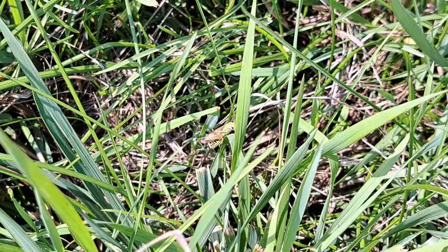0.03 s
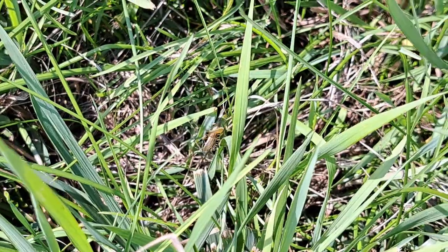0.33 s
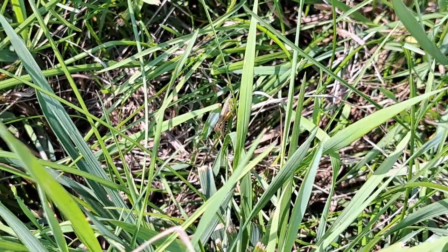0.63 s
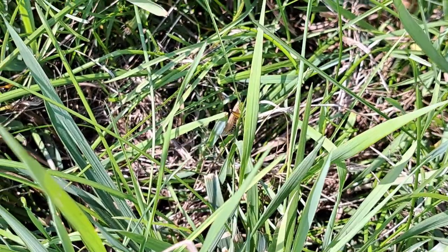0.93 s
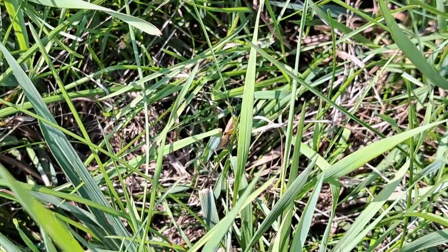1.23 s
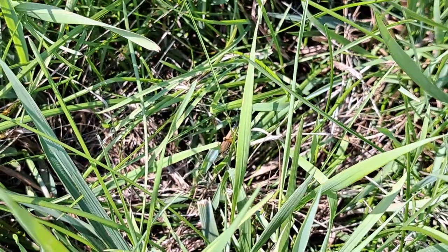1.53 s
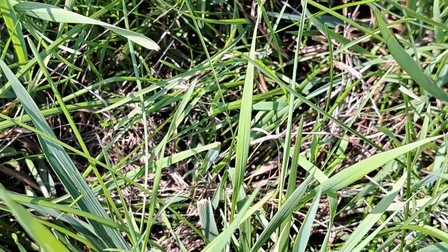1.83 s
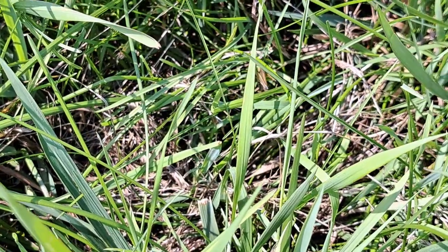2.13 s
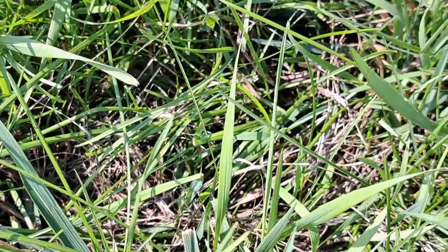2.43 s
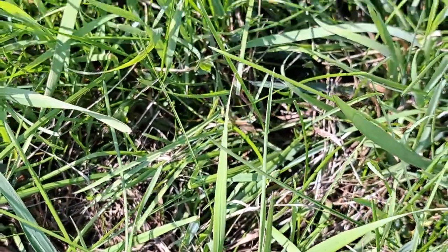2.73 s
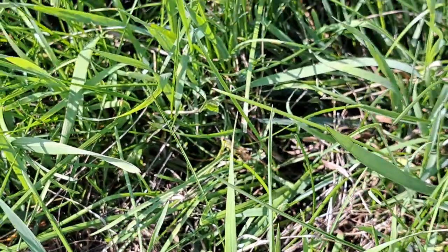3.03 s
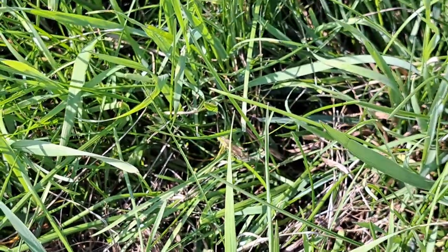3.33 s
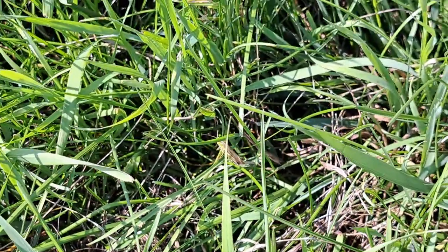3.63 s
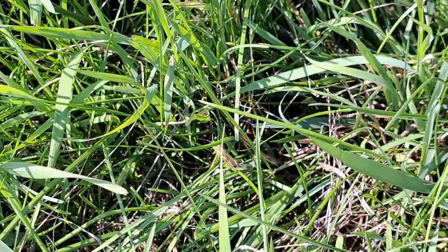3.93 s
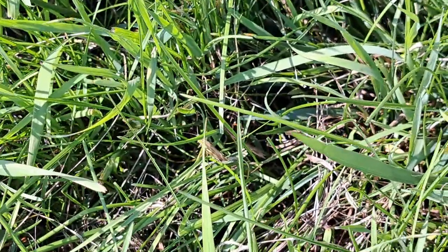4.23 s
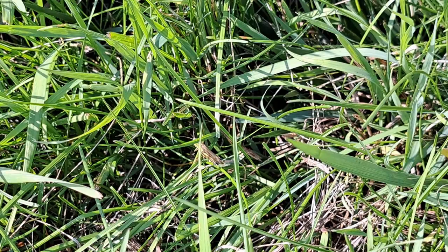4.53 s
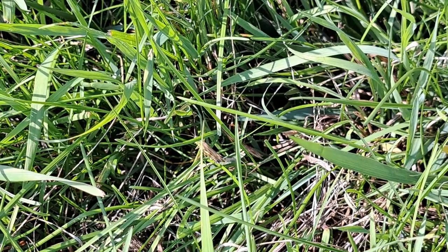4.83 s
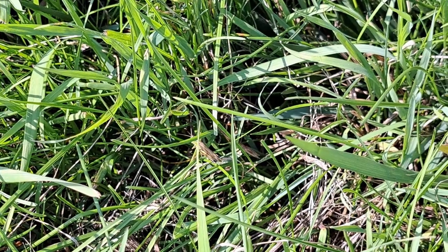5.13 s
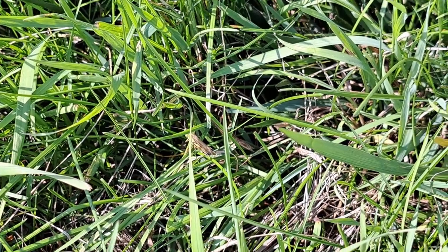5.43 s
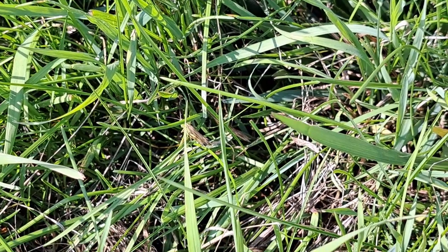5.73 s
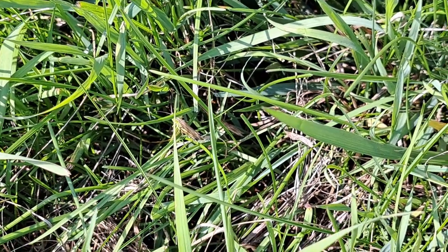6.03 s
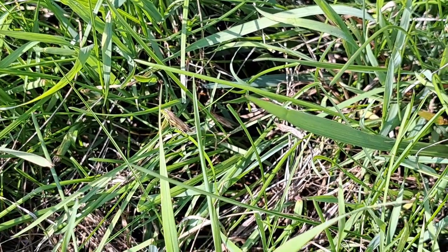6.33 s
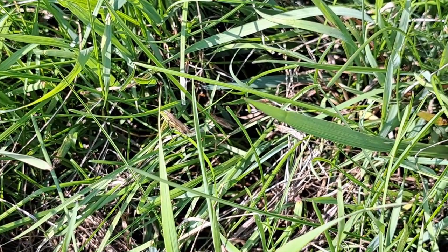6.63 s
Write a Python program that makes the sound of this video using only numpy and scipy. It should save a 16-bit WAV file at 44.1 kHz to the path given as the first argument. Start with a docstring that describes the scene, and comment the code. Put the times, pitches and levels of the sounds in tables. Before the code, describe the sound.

In a meadow, grasshoppers take turns making high, pulsing rasps while a bush-cricket buzzes steadily and a far engine drones.

```python
"""A grasshopper rasps on the left of a summer meadow and stops; after a few scrapes a far one answers,
then a near one swells on the right. They sing by stridulation: a row of pegs on the leg excites the wing,
about eight syllables a second, each a smooth stroke that breaks into four jerks. A bush-cricket buzzes
high above them without a pause. Far away an engine drones and throbs as its cylinders fire unevenly,
with a rumble and a second hum under a soft rush of air. Late on come faint rising plops and dull bumps."""
import sys
import numpy as np
from scipy import signal
from scipy.fft import rfft, irfft, next_fast_len
from scipy.io import wavfile
from scipy.ndimage import uniform_filter1d, map_coordinates

SR = 44100
rng = np.random.default_rng(int(sys.argv[2]) if len(sys.argv) > 2 else 0)


def file_out(sig):
    """Save sig as 16-bit WAV at sys.argv[1]."""
    # one column per channel
    cols = np.atleast_2d(sig).T
    # limit, then scale
    lim = np.clip(cols, -1, 1)
    pcm = np.round(lim * 32767).astype(np.int16)
    wavfile.write(sys.argv[1], SR, pcm)


N = 294588


def amp(db):
    """Decibels to amplitude ratio."""
    return 10 ** (np.asarray(db) / 20)

def unit(x):
    """Normalisation to rms 1."""
    return x / np.sqrt(np.mean(x ** 2) + 1e-20)

def clock():
    """The time of each sample in seconds."""
    return np.arange(N) / SR

def along(table, hz):
    """Interpolation of a table's columns on a logarithmic frequency axis."""
    knots_hz, *columns = np.transpose(table)
    return np.array([np.interp(np.log(hz + 1), np.log(knots_hz), c) for c in columns])

def curves(table):
    """Interpolation of a table's columns in time, one value per sample."""
    knots_s, *columns = np.transpose(table)
    return [np.interp(clock(), knots_s, c) for c in columns]

def wobble(knots_per_s):
    """Slow random modulation: a spline through Gaussian values."""
    return map_coordinates(rng.standard_normal(int(N * knots_per_s / SR) + 4), [clock() * knots_per_s])

def pulse(centre_s, width_s):
    """A Gaussian pulse in time."""
    return np.exp(-np.minimum(((clock() - centre_s) / width_s) ** 2, 20))

def filtered(x, response):
    """Linear filtering: the spectrum of x times a frequency response."""
    size = next_fast_len(N + SR // 2)
    return irfft(rfft(x, size) * response(np.fft.rfftfreq(size, 1 / SR)), size)[..., :N]

def stereo_noise(spectrum, coherence):
    """Partially coherent noise of rms 1: the sum and difference of two independent noises."""
    def weights(hz):
        alike = np.clip(along(coherence, hz)[0], -1, 1)
        return np.sqrt([1 + alike, 1 - alike])
    mid, side = filtered(rng.standard_normal((2, N)), weights)
    return unit(filtered(np.array([mid + side, mid - side]), lambda hz: amp(along(spectrum, hz))))

def leg_strokes(song, jerks, glide_db, glide_lead_s, glide_width_s, rest_db, jerk_width_s):
    """Stick-slip friction: a smooth stroke breaks into jerks; the leg never quite leaves the wing."""
    pressure = np.zeros(N)
    for last_s, level_db, last_jerk_db in song:  # a syllable is timed by its last jerk
        glide = amp(glide_db) * pulse(last_s - glide_lead_s, glide_width_s)
        stroke = glide + amp(rest_db) * pulse(last_s - 0.035, 0.088)
        for lead_s, jerk_db in jerks:
            later, harder = rng.standard_normal(2)
            jerk = amp(jerk_db + harder / 2) * pulse(last_s - lead_s + 0.00024 * later, jerk_width_s)
            stroke = np.maximum(stroke, jerk)
        stroke = np.maximum(stroke, amp(last_jerk_db) * pulse(last_s, 0.71 * jerk_width_s))
        pressure = np.maximum(pressure, amp(level_db) * stroke)
    return pressure

def peg_strikes(rate_hz, scatter_db):
    """Impulse excitation: the pegs of a file push or pluck a wing vein in uneven succession."""
    count = int(rate_hz * N / SR)
    slip, size, push = rng.standard_normal((count, 3)).T
    at = np.clip((np.arange(count) + slip / 4) * SR / rate_hz, 0, N - 1).astype(int)
    return unit(np.bincount(at, np.sign(push) * amp(scatter_db * size), N))

def radiate(force, wing, left_lead_ms, grass_db, grass_t60_s):
    """Radiation and scattering: strikes coloured by the wing arrive directly and as a haze off the grass."""
    decay = amp(-60 * np.arange(SR // 10) / SR / grass_t60_s) ** 2
    energy = np.abs(signal.fftconvolve(force ** 2, decay / decay.sum())[:N])
    scattered = np.sqrt(energy) * rng.standard_normal((2, N))
    advance_s = np.array([[0.5], [-0.5]]) * left_lead_ms / 1000
    direct = filtered(force, lambda hz: np.exp(2j * np.pi * hz * advance_s))
    return filtered(direct + amp(grass_db) * scattered, lambda hz: amp(along(wing, hz)))


# Jerks ahead of a syllable's last one: lead_s, gain_db
LEFT_LEG_JERKS = [(0.035, 0), (0.0254, 5), (0.0141, 6)]
# Wing response at each side: frequency_hz, left_db, right_db
LEFT_WING_RESPONSE = [(4000, -36, -37), (6000, -33, -40), (7000, -22, -28), (8100, -22.5, -36),
                      (8800, -18, -29), (9400, -11, -18), (10200, -10.5, -12), (11100, -6, -4),
                      (11900, -8.5, -5), (12700, -5.5, -0.5), (14500, 2.5, -3.5), (15700, -1, -7)]

def left_grasshopper(start_s=0.034, period_s=0.1245, syllables=13, stroke_db=-61.7):
    """Stridulation at a steady pace: a thin, bright song from deep in the grass that breaks off."""
    times = start_s + period_s * np.arange(syllables)
    song = [(s, stroke_db, 3.5 + 2 * rng.standard_normal()) for s in times]
    song.append((1.614, -68.5, 9.9))  # a weak closing stroke, mostly its last jerk
    pressure = leg_strokes(song, LEFT_LEG_JERKS, glide_db=-3.5, glide_lead_s=0.046,
                           glide_width_s=0.02, rest_db=-12.5, jerk_width_s=0.0024)
    force = pressure * peg_strikes(rate_hz=8990, scatter_db=1)
    return amp(14) * radiate(force, LEFT_WING_RESPONSE, left_lead_ms=0.459,
                             grass_db=-1.5, grass_t60_s=0.0096)


# Envelope of one wingbeat: phase_cycles, gain_db
WING_STROKE = [(0, -14.5), (.2, -7), (.35, -1.5), (.46, -3.5), (.53, -18.5), (.92, -11), (1, -14.5)]
# Strength of the buzz: time_s, level_db
BUZZ_LEVEL = [(0, -53), (0.5, -49.5), (1.55, -48), (1.9, -52.5), (2.8, -49.5), (3.3, -52.8), (3.95, -49),
              (4.55, -54), (5.25, -49.5), (5.9, -53), (6.3, -51.5), (6.6, -59)]
# Wing response at each side: frequency_hz, left_db, right_db
CRICKET_WING_RESPONSE = [(6900, -49, -53), (9760, -36, -31), (11150, -26, -31), (11800, -14, -21.5),
                         (12850, -10.5, -16), (13250, -11.5, -17.5), (14680, 0, -10.5), (15400, -1, -3.5)]
# Drift of the buzz on the right side: time_s, gain_db
BUZZ_RIGHT_GAIN = [(0, -4), (1.3, -5), (1.7, -0.5), (4, -2.5), (4.3, 2), (4.7, -5), (5.5, 0), (6.2, -2)]

def bush_cricket(wingbeat_hz=98.1, beat_scatter_db=0.5):
    """Amplitude modulation makes a buzz: each wingbeat is a closing stroke that swells and breaks off."""
    beats = wingbeat_hz * clock()
    stroke = amp(np.interp(beats % 1, *np.transpose(WING_STROKE)))
    strength = amp(beat_scatter_db * rng.standard_normal(int(beats[-1]) + 1))[beats.astype(int)]
    strikes = unit(stroke * strength * peg_strikes(rate_hz=8990, scatter_db=4))
    force = amp(curves(BUZZ_LEVEL)[0]) * strikes
    left, right = amp(4.5) * radiate(force, CRICKET_WING_RESPONSE, left_lead_ms=0.369,
                                     grass_db=0, grass_t60_s=0.0013)
    return np.array([left, right * amp(curves(BUZZ_RIGHT_GAIN)[0])])


# Engine speed: time_s, firing_hz
FIRING_RATE = [(0.0, 67.52), (2.19, 67.43), (2.9, 64), (4.13, 64.6), (4.39, 62.95), (5.21, 63.73),
               (6.32, 61.3), (6.68, 57.6)]
# Unevenness of the cylinders: time_s, depth_fraction
THROB_DEPTH = [(0, 0.01), (3, 0.11), (4.3, 0.6), (4.7, .9), (5.9, 0.44)]
# The engine pulls, eases off and pulls again: time_s, load_db
ENGINE_LOAD = [(0, -41), (1.1, -39), (2.55, -40), (2.72, -35.5), (2.88, -54.5), (3.45, -55.5), (3.9, -49.5),
               (4.15, -56), (4.65, -38), (6.33, -36.5), (6.45, -49), (6.68, -51)]

def engine(cylinders=6, weak_firing_s=4.9, weak_width_cycles=0.19, surge_hz=2.45, surge_crest_s=0.25):
    """A far exhaust note at the firing rate; a weak cylinder modulates it once per working cycle."""
    firings = np.cumsum(curves(FIRING_RATE)[0]) / SR
    firings -= np.interp(weak_firing_s, clock(), firings)
    from_weak = (firings / cylinders + 0.5) % 1 - 0.5
    weak = np.exp(-(from_weak / weak_width_cycles) ** 2) * curves(THROB_DEPTH)[0]
    phase = 2 * np.pi * firings
    # at the weak cylinder the note dips and the pipe rings faster
    pipe_ring = 0.99 * weak * np.cos(phase + 2 * phase / cylinders)
    note = (1 - weak) * np.sin(phase) + pipe_ring + amp(-31) * np.sin(3 * phase)
    note /= np.sqrt(np.abs(uniform_filter1d(2 * note ** 2, SR // 2)))  # even power over half a second
    surge_db = np.cos(2 * np.pi * surge_hz * (clock() - surge_crest_s))
    level_db = curves(ENGINE_LOAD)[0] + 2 + surge_db + wobble(11)
    return amp(level_db) * note * amp([[0.1], [-0.1]])


# Spectrum of the rumble: frequency_hz, gain_db
RUMBLE_SPECTRUM = [(20, -12), (32, -6), (52, 2.5), (90, 2.5), (140, -0.5), (200, -9), (260, -12),
                   (350, -22), (500, -34), (900, -49)]
# Left-right likeness of low noise: frequency_hz, coherence_fraction
LOW_COHERENCE = [(60, 0.64), (130, 0.94), (300, 0.86), (600, 0.17)]

def rumble(mean_db=-53, db_per_load_db=0.31, flutter_db=0.97):
    """Low-frequency noise, amplitude-modulated by the engine's load."""
    load_db, = curves(ENGINE_LOAD)
    level_db = mean_db + db_per_load_db * (load_db - load_db.mean()) + flutter_db * wobble(12)
    return amp(level_db) * stereo_noise(RUMBLE_SPECTRUM, LOW_COHERENCE)


# Slow drift of the breeze: time_s, level_db
BREEZE_LEVEL = [(1.2, -64.5), (3.1, -66.5), (4.6, -63.5), (6.6, -66)]
# Spectrum of the breeze: frequency_hz, left_db, right_db
BREEZE_SPECTRUM = [(200, -8.5, -18.5), (530, -11, -13.5), (664, -8.5, -10.5), (844, -0.5, -3.5),
                   (1040, 0, 1.5), (1362, -5.5, 4), (1650, -8, -6), (2123, -16, -16.5), (2940, -23.5, -21),
                   (6300, -28.5, -28.5), (7550, -24.5, -21), (11300, -19.5, -20.5), (15700, -15.5, -14)]
# Left-right likeness of the breeze: frequency_hz, coherence_fraction
BREEZE_COHERENCE = [(300, 0.4), (640, 0.57), (1400, 0.09), (3000, 0)]

def breeze(flutter_db=0.5):
    """Broadband noise, incoherent in the treble: the soft rush and hiss of the open meadow."""
    level_db = curves(BREEZE_LEVEL)[0] + flutter_db * wobble(10)
    return amp(level_db) * stereo_noise(BREEZE_SPECTRUM, BREEZE_COHERENCE)


# The hum comes and goes: time_s, level_db
HUM_LEVEL = [(0.5, -70), (1.1, -51.5), (1.8, -62), (2.35, -49), (3.1, -74), (3.4, -57), (5, -54),
             (6.68, -62.5)]

def hum(pitch_hz=122.5, waver_hz=1.19, flutter_db=1.7):
    """A distant pure tone with slight random modulation of frequency and amplitude."""
    level_db = curves(HUM_LEVEL)[0] + flutter_db * wobble(13)
    phase = 2 * np.pi * np.cumsum(pitch_hz + waver_hz * wobble(3)) / SR
    return amp(level_db) * unit(np.sin(phase))


# Short dry scrapes: start_s, length_s, level_db
LOOSE_SCRAPES = [(1.935, 0.15, -73.5), (2.275, 0.066, -67), (2.478, 0.024, -67.5), (2.498, 0.06, -69.5)]
# Dry ticks: time_s, level_db
DRY_TICKS = [(2.05, -67), (2.104, -59.5), (2.35, -61)]
# Wing response to both: frequency_hz, left_db, right_db
SCRAPE_RESPONSE = [(4000, -40, -28), (6600, -6, -24), (7500, -12, 3), (9900, -11, 6.5), (11800, -17, -8),
                   (12700, 11, 9), (15800, 4, 0)]

def scrapes():
    """Stridulation in single strokes: loose scrapes and ticks in the pause after the first song."""
    strokes = sum(amp(db) * pulse(s + length / 2, 0.59 * length) for s, length, db in LOOSE_SCRAPES)
    ticks = sum(amp(db) * pulse(s, 0.0022) for s, db in DRY_TICKS)
    force = (strokes + ticks) * peg_strikes(rate_hz=6190, scatter_db=5)
    return amp(1) * radiate(force, SCRAPE_RESPONSE, left_lead_ms=-0.15,
                            grass_db=-7.5, grass_t60_s=0.0048)


# Jerks ahead of a syllable's last one, in the far and the right song: lead_s, gain_db
ANSWER_JERKS = [(0.041, 2.6), (0.03, 5.6), (0.0151, 7.14)]
# Wing response at each side: frequency_hz, left_db, right_db
FAR_WING_RESPONSE = [(4000, -33, -32), (6000, -21, -11), (7400, -14, -1), (9000, -14, -4), (10400, -9, 2),
                     (12000, -8, -4), (15800, -8, -4)]

def far_grasshopper(start_s=2.826, period_s=0.1326, syllables=9, stroke_db=-71.5, swell_db=6):
    """Stridulation at a distance: a faint, slightly slower song that grows a little."""
    song = [(start_s + period_s * k, stroke_db - swell_db * np.exp(-k / 3), 3) for k in range(syllables)]
    pressure = leg_strokes(song, ANSWER_JERKS, glide_db=-11, glide_lead_s=0.06,
                           glide_width_s=0.02, rest_db=-11, jerk_width_s=0.0036)
    force = pressure * peg_strikes(rate_hz=9500, scatter_db=2)
    return amp(5) * radiate(force, FAR_WING_RESPONSE, left_lead_ms=-0.25,
                            grass_db=-2.5, grass_t60_s=0.01)


# Wing response at each side: frequency_hz, left_db, right_db
RIGHT_WING_RESPONSE = [(3000, -37, -33), (4230, -29, -31), (5030, -22, -13), (6100, -19.5, -7),
                       (7320, -12.5, 0), (8100, -15, 0), (8940, -17.5, -9), (10300, -14, -4),
                       (11760, -18, -12), (12860, -8, -0.5), (15700, -8, -2.5)]

def right_grasshopper(start_s=4.0695, period_s=0.122, syllables=22, hurry_s=0.0329, slowing_s=0.0002487,
                      crest_s=5.95, swell_db_per_s=5.5, fade_db_per_s=4.5, treble_hz=9200):
    """Stridulation close by: soft, dull and hurried at first, it swells, brightens, slows and eases off."""
    k = np.arange(syllables)
    unsettled = np.exp(-k / 5.25)  # the singer settles over about five syllables
    times = start_s + period_s * k + slowing_s * k ** 2 / 2 - hurry_s * (1 - unsettled)
    below_crest_db = np.maximum(swell_db_per_s * (crest_s - times), fade_db_per_s * (times - crest_s))
    stroke_db = -50.5 - below_crest_db - 7 * np.exp(-k)
    last_jerk_db = 6 - 18 * unsettled  # all but missing at first
    song = zip(times, stroke_db, last_jerk_db)
    pressure = leg_strokes(song, ANSWER_JERKS, glide_db=-11.5, glide_lead_s=0.065,
                           glide_width_s=0.017, rest_db=-10.5, jerk_width_s=0.0027)
    force = pressure * peg_strikes(rate_hz=9940, scatter_db=2.5)
    rasp = amp(5.5) * radiate(force, RIGHT_WING_RESPONSE, left_lead_ms=-0.254,
                              grass_db=-4, grass_t60_s=0.0075)
    treble = filtered(rasp, lambda hz: 1 - 1 / (1 + (hz / treble_hz) ** 20))
    treble_db = 2 - 7 * np.interp(clock(), times, unsettled)
    return rasp - treble + amp(treble_db) * treble


# A rising run of plops: start_s, pitch_hz, level_db
PLOP_NOTES = [(4.221, 315, -47), (4.349, 352, -43.5), (4.451, 402, -48), (4.518, 418, -48),
              (4.64, 465, -54)]

def plops(t60_s=0.081, rise_per_s=1.2, attack_s=0.00075):
    """Damped sinusoids: soft, hollow plops, each gliding up a little as it dies."""
    out = np.zeros(N)
    for start_s, pitch_hz, level_db in PLOP_NOTES:
        t = np.clip(clock() - start_s, 0, 1)
        envelope = amp(level_db - 60 * t / t60_s) * (1 - np.exp(-t / attack_s))
        out += envelope * np.sin(2 * np.pi * pitch_hz * t * (1 + rise_per_s * t / 2))
    return out


# Soft bumps: centre_s, width_s, level_db
SOFT_BUMPS = [(4.833, .01, -66), (4.88, 0.014, -65), (5.005, 0.0096, -68), (5.515, 0.024, -63.5)]
# Spectrum of a bump: frequency_hz, gain_db
BUMP_SPECTRUM = [(120, -8), (230, 6), (550, -1.5), (800, -13), (1600, -29)]

def bumps():
    """Noise transients: dull handling bumps, each a Gaussian pulse of low-frequency noise."""
    envelope = sum(amp(db) * pulse(s, width) for s, width, db in SOFT_BUMPS)
    return envelope * stereo_noise(BUMP_SPECTRUM, LOW_COHERENCE)


def scene():
    """Superposition of four insects and the far background."""
    opening = left_grasshopper() + bush_cricket() + engine() + rumble() + breeze() + hum()
    return opening + scrapes() + far_grasshopper() + right_grasshopper() + plops() + bumps()

def record(dry):
    """Band limiting by an ideal low-pass filter."""
    cutoff_hz = 15800
    return filtered(dry, lambda hz: hz < cutoff_hz)


dry = scene()
out = record(dry)
file_out(out)
```